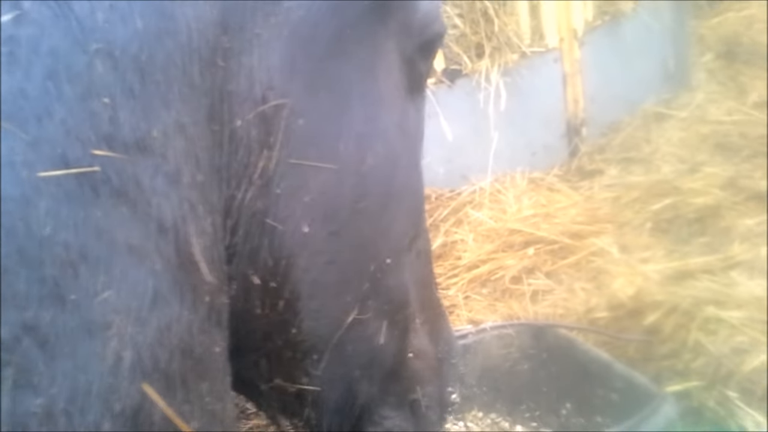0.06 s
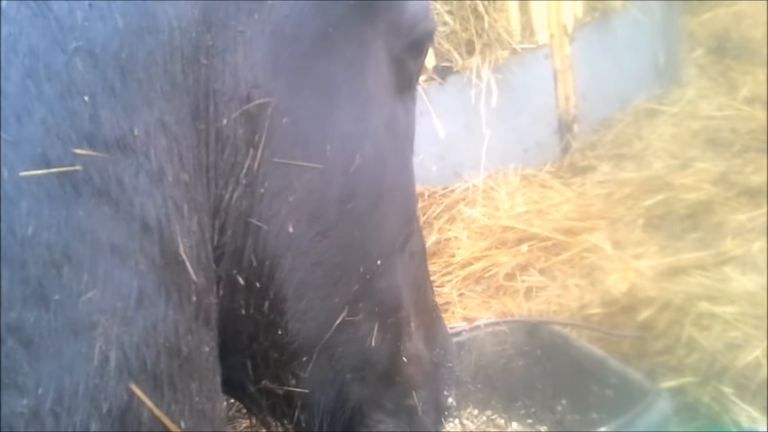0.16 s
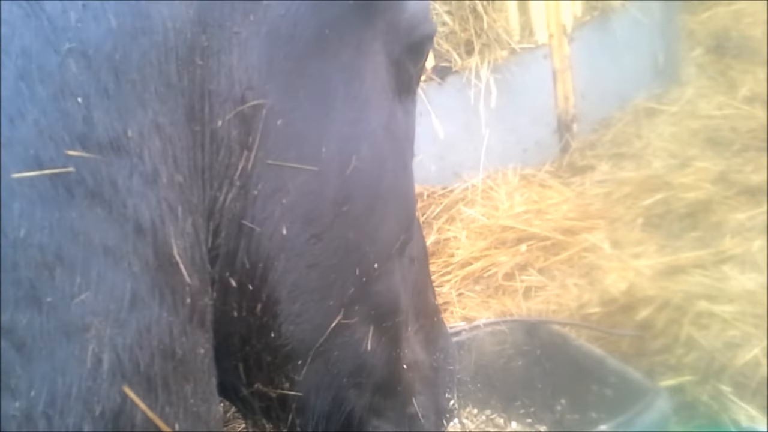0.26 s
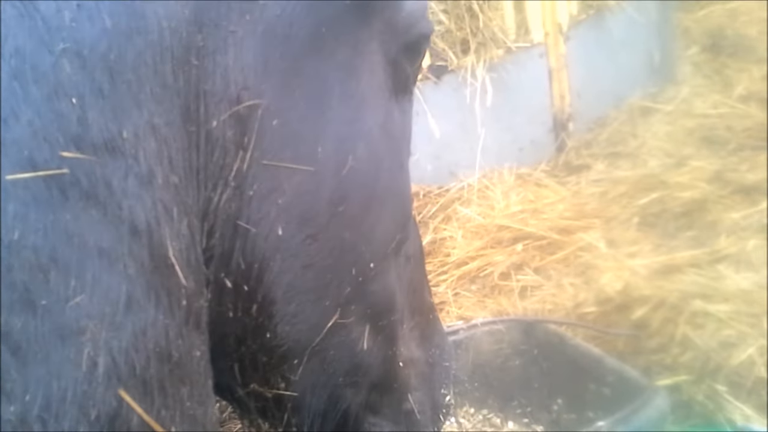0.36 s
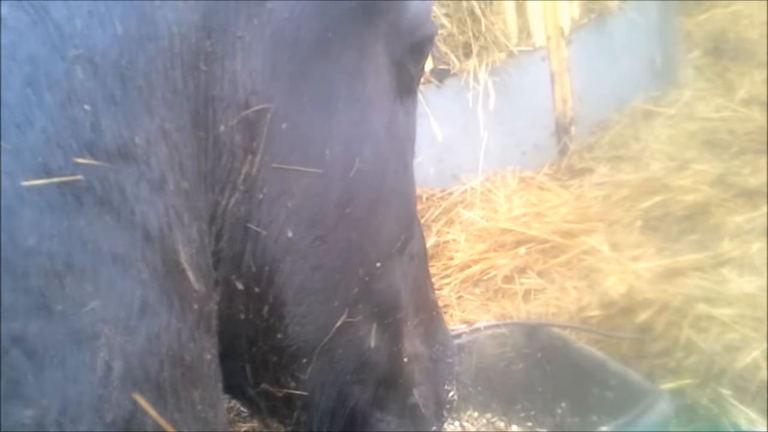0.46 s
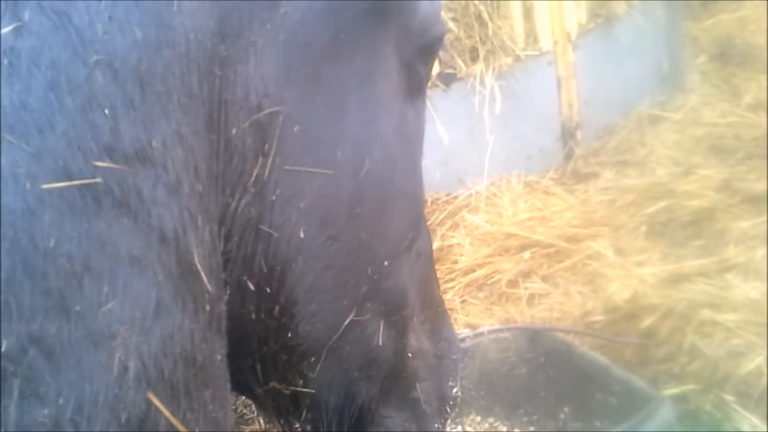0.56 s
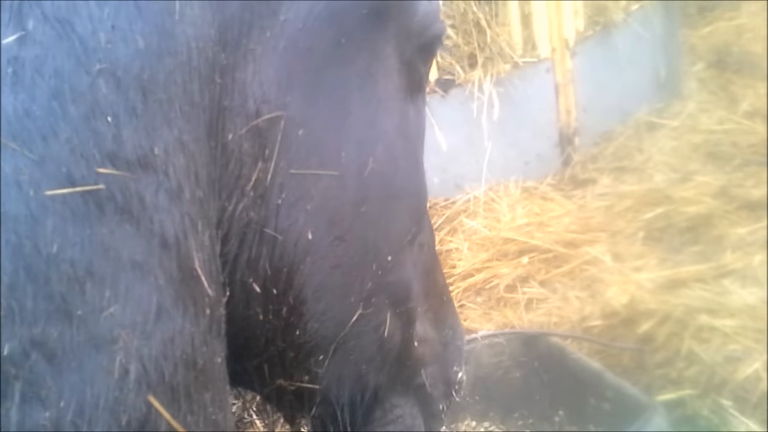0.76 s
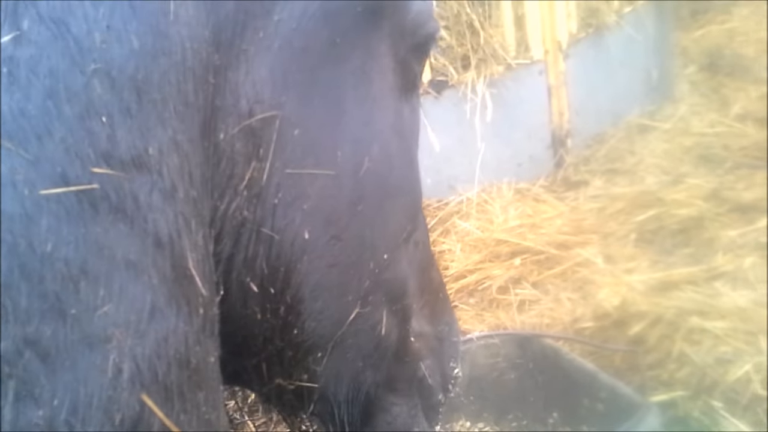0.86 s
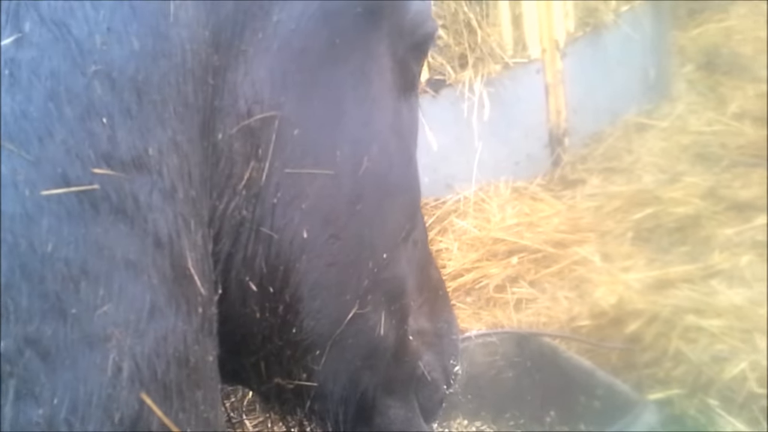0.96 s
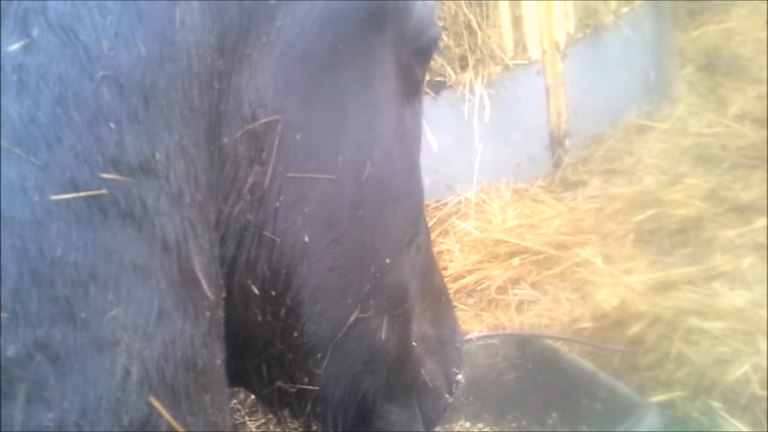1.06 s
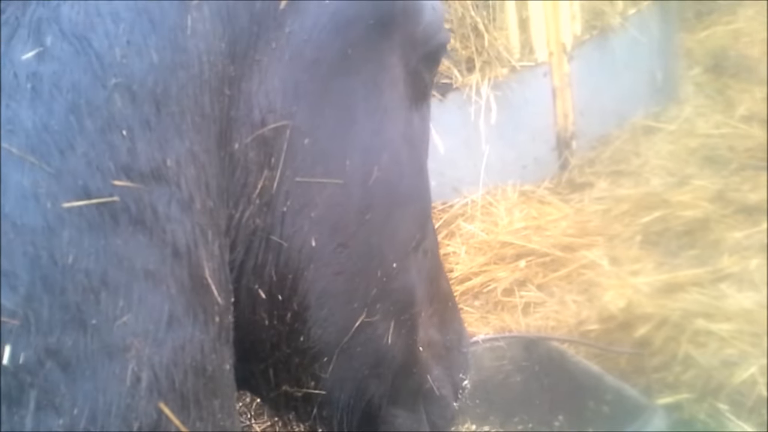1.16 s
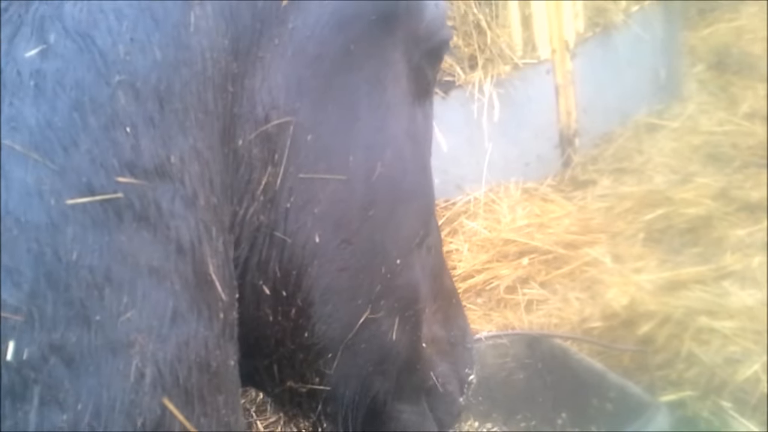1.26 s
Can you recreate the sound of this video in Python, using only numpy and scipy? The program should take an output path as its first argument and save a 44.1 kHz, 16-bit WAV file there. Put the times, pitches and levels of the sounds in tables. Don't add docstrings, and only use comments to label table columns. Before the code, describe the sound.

Close crunching of grain in a pony's mouth, with dry rustle, sharp cracks and tub knocks.

```python
import sys
import numpy as np
from scipy import signal
from scipy.fft import irfft
from scipy.io import wavfile
from scipy.ndimage import uniform_filter1d

SR = 44100
rng = np.random.default_rng(int(sys.argv[2]) if len(sys.argv) > 2 else 0)


def gain_from_db(level_db):
    decades = np.asarray(level_db, float) / 20
    return 10 ** decades


def log_audio(samples):
    frames = np.atleast_2d(samples).T
    limited = np.clip(frames, -1, 1)
    pcm = np.round(limited * 32767).astype(np.int16)
    wavfile.write(sys.argv[1], SR, pcm)


N = 57330

# f/Hz, density/dB
STABLE_SPECTRUM = [(25, 5.5), (70, -1), (200, 0.5), (500, -4), (1100, -9.5), (2000, -13.5), (5000, -62),
                   (16000, -14)]
STABLE_DB = -49.5

# t/s, level/dB, brightness/(0-1)
GRINDING_EFFORT = [(.13, -54.5, 0.2), (.17, -42.5, 0.16), (.22, -35.5, 0.17), (.305, -36, 0.56),
                   (0.358, -47, 0.28), (0.404, -30, 0), (.44, -32, 0.34), (0.524, -39, 0.04),
                   (0.584, -29, 0.62), (.64, -32.5, 0.24), (.675, -35, 0.7), (0.701, -31, 0.87),
                   (0.746, -32.5, 0.38), (.765, -41.5, 0.15), (.86, -42.5, 0), (.95, -50.5, 0.03),
                   (1.07, -47.5, 0.3), (1.1, -51.5, 0.14)]
# f/Hz, density/dB
DULL_SPECTRUM = [(300, -41), (700, -8), (1400, 2), (3500, 7), (4700, 1), (6000, 5), (11300, -3.5),
                 (12500, -8), (16000, -3.5)]
# f/Hz, density/dB
BRIGHT_SPECTRUM = [(300, -23), (900, -40), (2400, -15), (3300, -5), (6300, -1.5), (10800, -3.5),
                   (12500, -8.5), (16000, -27)]
GRAINS_PER_S, GRAIN_SPREAD_DB, HISS_SHARE, CLUMP_DB = 9000, 2.2, .9, 1.3
EARLY_RUSTLE_DB, EARLY_RUSTLE_S = -61, 0.062
SETTLE_DB_PER_S = -15

# t/s, peak level/dB, first f/Hz, second f/Hz, shatter level/dB
HUSK_SNAPS = [(.0038, -45, 3380, 7900, -4), (.0270, -41, 3700, 5500, 1), (.0898, -45, 2700, 3300, -12),
              (.1530, -46, 2830, 7000, -2), (.1700, -37, 3800, 5770, -3), (.2025, -25, 3760, 3500, -5),
              (.2075, -27, 4700, 1500, -6), (.2205, -23, 3220, 3800, -1), (.2282, -30, 3560, 5500, -2),
              (.2325, -28, 3600, 7690, -3), (.2400, -31, 3700, 8000, -3), (.2420, -31, 3700, 5500, -1),
              (.2515, -29, 3670, 5260, 3), (.2658, -28, 3450, 3800, 2), (.2982, -34, 6900, 8300, 0),
              (.3218, -36, 4700, 7000, 2), (.3598, -35, 2900, 5600, 0), (.3748, -33, 3500, 6150, -3),
              (.5409, -33, 3700, 5600, -4), (.7975, -34, 3500, 4400, -14), (.8554, -44, 6300, 6100, -4),
              (1.0318, -36, 3350, 7200, -16), (1.0488, -44, 5400, 8800, -8), (1.0686, -35, 5300, 6600, -14),
              (1.0688, -40, 3500, 4500, -16)]
# t/s, peak level/dB, first f/Hz, second f/Hz, shatter level/dB
HUSK_TICKS = [(.0240, -42, 2700, 7200, -10), (.0272, -41, 10500, 7800, 3), (.0470, -45, 7700, 10500, -8),
              (.0535, -50, 3500, 6000, -4), (.0962, -49, 5400, 6500, -8), (.2535, -36, 2400, 10500, -8),
              (.2665, -37, 5200, 10400, -10), (.2992, -30, 9000, 7000, -4), (.3012, -36, 3300, 2600, -10),
              (.3165, -39, 5000, 6500, -8), (.3222, -34, 9200, 5400, -2), (.3392, -42, 5300, 9000, -6),
              (.3725, -41, 4200, 3200, -8), (.3815, -38, 6300, 8200, -6), (.7195, -31, 6300, 4800, -8),
              (.7490, -35, 6400, 3000, -10), (.7975, -40, 6100, 1600, -14), (1.0685, -43, 8800, 4500, -12),
              (1.0775, -47, 7900, 3000, -10)]
# t/s, peak level/dB, first f/Hz, second f/Hz, shatter level/dB
KERNEL_CRACKS = [(.3985, -20.5, 1930, 3200, -3), (.4040, -24, 1870, 2400, -1),
                 (.4118, -11, 1710, 1550, -8.5), (.4126, -17, 3510, 2980, -11),
                 (.4154, -12, 1726, 1570, -7.5), (.4244, -26, 2280, 3340, 4.5),
                 (.4314, -21.5, 2580, 3270, -3), (.4878, -27, 1860, 3290, 1),
                 (.5834, -15.5, 2160, 1680, -6.5), (.5886, -10, 2780, 3200, -16),
                 (.6040, 0, 2580, 4100, -13), (.6044, -16, 9900, 11160, -18), (.6045, -9, 3220, 8270, -1),
                 (.6046, -4, 5360, 7100, -10), (.6124, -19, 1790, 3280, -8), (.6164, -20.5, 2450, 3300, -4),
                 (.6235, -13.5, 2170, 3120, -5), (.6250, -16, 2330, 1480, -12),
                 (.6268, -14.5, 2500, 3330, -26), (.6286, -17, 2160, 3200, -28),
                 (.6334, -30, 2600, 3420, -12), (.6564, -24.5, 2320, 3850, -14),
                 (.7384, -19.5, 1850, 3170, 0), (.7979, -22, 2450, 3780, -15), (.9174, -34, 2630, 2830, -3),
                 (.9844, -37, 2680, 2850, -21), (1.0292, -30, 3060, 7500, -14),
                 (1.0317, -17, 3070, 3530, -15), (1.0384, -32, 2520, 3420, -15)]
# f/Hz, level/dB, T60/s
TOOTH_MODES = [(1389, -13, 0.022), (1836, -11, 0.022), (2390, 0, 0.0093), (4107, -2, 0.011),
               (4791, -3, 0.011), (5329, -1, 0.0098), (7127, -9, 0.014), (8317, -6, 0.0084),
               (8866, -13, 0.0096), (9458, -16, 0.0096), (9943, -14, 0.0098), (10940, -21, 0.012)]
MODE_SPREAD, FRACTURE_MS, THIN_HZ = 0.096, 1.8, 1000
RING_RISE_S, RING_T60_S, LONGEST_MODE_T60_S, MODE_ONSET_S = .001, .0072, .009, .0003
KERNEL_FIZZ_DB, HUSK_FIZZ_DB = -28, -8
HUSK_GAIN_DB = 4.5

TUB_T60_S, TUB_DB = 0.055, -14

# t/s, duration/s, level/dB
NUZZLES = [
    (0.032, 0.086, -53),
    (0.345, 0.13, -53),
    (0.568, 0.076, -50),
    (0.722, 0.072, -56),
]
# f/Hz, density/dB
NUZZLE_SPECTRUM = [(40, -8), (130, 6), (350, 5), (600, -16), (16000, -70)]

# t/s,
# level/dB, f/Hz
KNOCKS = [(0.202, -34, 1090), (.397, -35, 300), (.403, -29, 1000), (0.41, -30, 590), (.582, -22.5, 490),
          (0.605, -30, 313), (0.6035, -12.5, 1383), (0.605, -13, 1780), (.624, -30.5, 370),
          (0.6252, -26, 1440), (.6245, -32, 737), (.633, -35, 490), (0.632, -28, 1560),
          (.739, -33.5, 810), (0.796, -34, 1030), (1.032, -29, 1600)]
KNOCK_T60_S = .016

# f/Hz, level/dB
THIN_TONES = [(2900, -53), (3280, -49), (3620, -47), (4870, -50), (5160, -50), (5680, -47),
              (6460, -52), (6760, -50), (7260, -50), (9100, -50)]
TONES_S, TONES_LEN_S, TONES_DIP_DB = .279, .019, -16

# t/s, duration/s, level/dB, f/Hz
BIRD_NOTES = [
    (.815, .17, -53, 3552),
    (1.095, .19, -61, 3572),
]

CEILING, LOW_CUT_HZ, EDGE_HZ = 1.0, 140, 15900


def evened(x):
    return x / np.sqrt(np.mean(x ** 2) + 1e-20)


def smooth_noise(shape, width):
    noise = rng.standard_normal(shape)
    return evened(uniform_filter1d(uniform_filter1d(noise, width), width))


def soft_onset(t, rise_s):
    return np.sin(np.pi / 2 * np.minimum(t / rise_s, 1)) ** 2


def add(mix, s, sound):
    part = mix[round(s * SR):][:len(sound)]
    part += sound[:len(part)]


def coloured(x, spectrum):
    f, level = np.transpose(spectrum)
    hz = np.fft.rfftfreq(4096, 1 / SR)
    response = gain_from_db(np.interp(np.log(hz + 1), np.log(f + 1), level))
    taps = np.roll(irfft(response), 2048) * np.hanning(4096)
    return evened(signal.oaconvolve(x, taps, "same"))


def stable_air():
    return gain_from_db(STABLE_DB) * coloured(rng.standard_normal(N), STABLE_SPECTRUM)


def grinding():
    t = np.arange(N) / SR
    s, db, bright = np.transpose(GRINDING_EFFORT)
    clump = smooth_noise(N, 120)
    size = gain_from_db(GRAIN_SPREAD_DB * np.minimum(rng.exponential(1, (2, N)), 5))
    polarity = rng.choice([-1., 1.], (2, N))
    clicks = size * polarity * (rng.random((2, N)) < GRAINS_PER_S / SR)
    drive = (evened(clicks) + HISS_SHARE * rng.standard_normal((2, N))) * gain_from_db(CLUMP_DB * clump)
    mix = np.clip(np.interp(t, s, bright), 0, 1)
    dull_part = np.sqrt(1 - mix) * coloured(drive[0], DULL_SPECTRUM)
    bright_part = np.sqrt(mix) * coloured(drive[1], BRIGHT_SPECTRUM)
    early = gain_from_db(EARLY_RUSTLE_DB) * np.clip((EARLY_RUSTLE_S - t) / .01, 0, 1)
    effort = gain_from_db(np.interp(t, s, db) + SETTLE_DB_PER_S * np.maximum(t - s[-1], 0))
    return (dull_part + bright_part) * (effort + early)


def crack(db, first_hz, second_hz, shatter_db, chance, fizz):
    t = np.arange(1300) / SR
    decay = gain_from_db(-60 * np.maximum(t - RING_RISE_S, 0) / RING_T60_S)
    swell = soft_onset(t, RING_RISE_S) * decay
    rings = swell * sum(np.sin(2 * np.pi * (hz * t + c)) for hz, c in zip((first_hz, second_hz), chance[8:10]))

    modes = np.zeros(len(t))
    for (hz, mode_db, t60), c in zip(TOOTH_MODES, chance[20:]):
        detuned_hz = hz * (1 + MODE_SPREAD * (2 * c - 1))
        modes += gain_from_db(mode_db - 60 * t / min(t60, LONGEST_MODE_T60_S)) * np.sin(2 * np.pi * detuned_hz * t)

    place = (np.arange(10) + chance[:10]) / 10
    ticks = np.zeros(len(t))
    strength = (2 * chance[10:20] - 1) * (.5 + 0.084 * place)
    np.add.at(ticks, (place * FRACTURE_MS * SR / 1000).astype(int), strength)
    shatter = np.convolve(ticks, modes * soft_onset(t, MODE_ONSET_S))[:len(t)]
    return gain_from_db(db) * (rings / 2 + gain_from_db(shatter_db) * (shatter / abs(shatter).max() + swell * fizz))


def fractures(table, fizz_db, gain_db):
    out = np.zeros(N)
    for s, *row in table:
        fizz = gain_from_db(fizz_db) * rng.standard_normal(1300)
        add(out, s, gain_from_db(gain_db) * crack(*row, rng.random(32), fizz))
    return signal.sosfilt(signal.butter(6, THIN_HZ, "high", fs=SR, output="sos"), out)


def husks():
    snaps = fractures(HUSK_SNAPS, HUSK_FIZZ_DB, HUSK_GAIN_DB)
    return snaps + fractures(HUSK_TICKS, HUSK_FIZZ_DB, HUSK_GAIN_DB)


def tub(x):
    t = np.arange(4000) / SR
    tail = rng.standard_normal(4000) * gain_from_db(-60 * t / TUB_T60_S) * (t > .002)
    return gain_from_db(TUB_DB) * signal.oaconvolve(x, tail / np.linalg.norm(tail))[:N]


def nuzzling():
    t = np.arange(N) / SR
    swell = np.zeros(N)
    for s, length, db in NUZZLES:
        swell += gain_from_db(db) * np.sin(np.pi * np.clip((t - s) / length, 0, 1))
    return swell * coloured(rng.standard_normal(N), NUZZLE_SPECTRUM)


def knocks():
    out = np.zeros(N)
    t = np.arange(3000) / SR
    for s, db, hz in KNOCKS:
        envelope = gain_from_db(db - 60 * t / KNOCK_T60_S) * soft_onset(t, 0.001)
        add(out, s, envelope * np.sin(2 * np.pi * hz * t))
    return out


def tones_window():
    u = (np.arange(N) / SR - TONES_S) / TONES_LEN_S
    return np.sin(np.pi * np.clip(u, 0, 1))


def thin_tones():
    t = np.arange(N) / SR
    partials = sum(gain_from_db(db + 5) * np.sin(2 * np.pi * (hz * t + rng.random())) for hz, db in THIN_TONES)
    return np.minimum(2 * tones_window(), 1) * partials


def kernels():
    return fractures(KERNEL_CRACKS, KERNEL_FIZZ_DB, 0)


def bird():
    t, out = np.arange(N) / SR, np.zeros(N)
    level_waver, pitch_waver = smooth_noise((2, N), 500)
    for s, length, db, hz in BIRD_NOTES:
        u = np.clip((t - s) / length, 0, 1)
        fade = np.minimum(8 * u, 1) * np.minimum(6 * (1 - u), 1)
        level = gain_from_db(db + 3 - 4 * u + 1.5 * level_waver)
        out += fade * level * np.sin(2 * np.pi * np.cumsum(hz + 8 * pitch_waver) / SR)
    return out


def scene():
    bed = stable_air() + grinding()
    hits = husks() + knocks() + kernels()
    dipped_bed = bed * gain_from_db(TONES_DIP_DB * tones_window())
    return (dipped_bed + hits + tub(hits) + nuzzling() + thin_tones() + bird())[None]


def roll_off(x):
    return signal.sosfilt(signal.butter(12, 16820, fs=SR, output="sos"), x)


def record(dry):
    x = np.clip(dry, -CEILING, CEILING)
    x = signal.sosfilt(signal.butter(2, LOW_CUT_HZ, "high", fs=SR, output="sos"), x)
    band_limit = signal.firwin(401, EDGE_HZ, window=("kaiser", 9), fs=SR)
    x = signal.oaconvolve(x, band_limit[None], "same")
    return roll_off(x)


dry = scene()
out = record(dry)
log_audio(out)
```